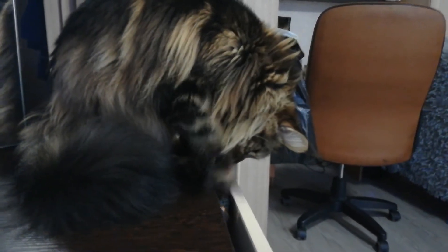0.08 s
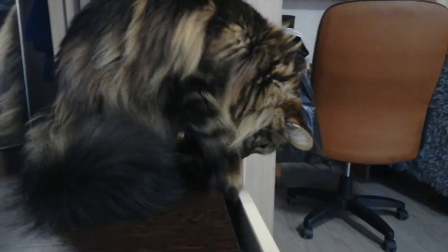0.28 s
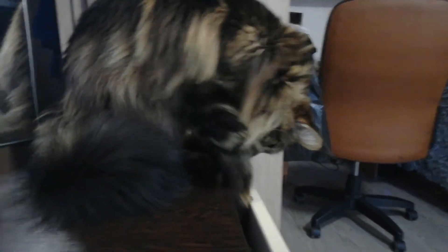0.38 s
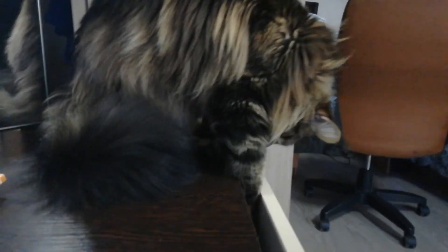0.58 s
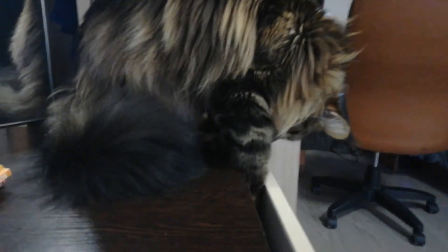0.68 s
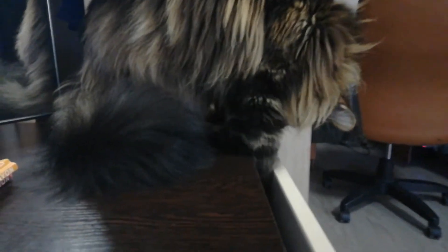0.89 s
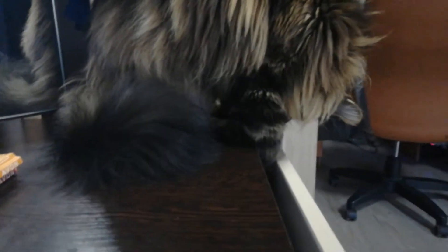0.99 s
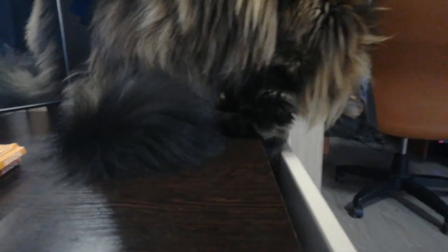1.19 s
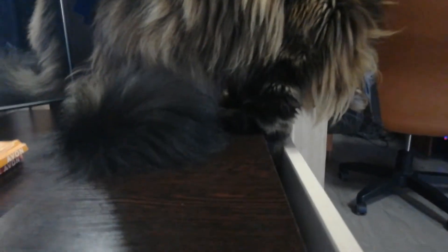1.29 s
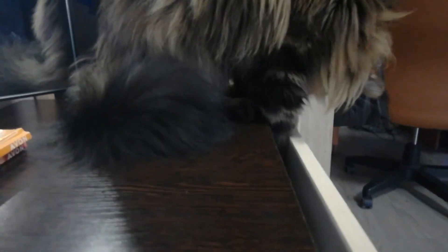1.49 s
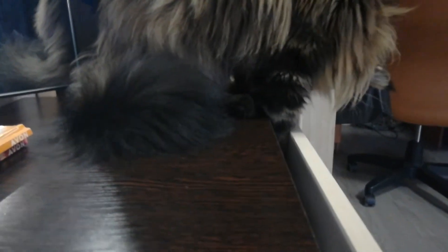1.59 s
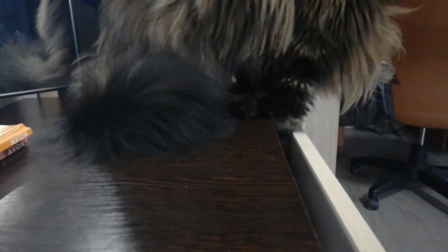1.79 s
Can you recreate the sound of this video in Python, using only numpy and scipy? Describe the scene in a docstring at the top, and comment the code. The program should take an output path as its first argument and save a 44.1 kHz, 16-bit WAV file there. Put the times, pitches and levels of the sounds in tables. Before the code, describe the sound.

Light clacks and ticks of small things pawed in a gap at a wooden desk's edge.

```python
"""Small hard objects knock on a wooden desk as a cat's paw fishes in a narrow gap at its edge.
Each knock is a click with a brief chatter: it makes the object clack, crack and tick,
the desk boom and the gap ring hollow. Between knocks the object drags lightly, the paw
pushes on the desk and fur brushes the boards. The small room echoes the knocks and rumbles quietly."""
import sys
import numpy as np
from scipy import signal
from scipy.fft import rfft, irfft
from scipy.io import wavfile
from scipy.ndimage import uniform_filter1d

SR = 44100
rng = np.random.default_rng(int(sys.argv[2]) if len(sys.argv) > 2 else 0)


def wav_record(signal):
    """Record a signal, one row per channel, as 16-bit PCM in the file named by sys.argv[1]."""
    frames = np.transpose(np.atleast_2d(signal))
    bounded = np.clip(frames, -1, 1)
    # unit amplitude maps onto the largest positive 16-bit level
    quanta = np.round(bounded * 32767).astype(np.int16)
    wavfile.write(sys.argv[1], SR, quanta)


N = 81585

# Each knock: t/s, level/dB of five parts (desk, hollow, clack, crack, tick),
# clack f/Hz, spread of the clack's tones (0 = all on one pitch), chatter length/s
KNOCKS = [ (0.1268, -37, -53, -40, -47, -40, 1400, 0.95, .0012),
          (0.2137, -20.5, -34, -19, -25, -12, 1480, 1.33, 0.0018),
          (0.3534, -42, -43, -38, -45, -44.5, 1910, 0.62, 0.0021),
          (0.4618, -50.5, -48, -42.5, -79, -71, 1650, 0.26, 0.0011),
          (0.4704, -44.5, -50.5, -41, -47, -47, 1400, 0.8, .0011),
          (0.5068, -48.5, -84, -52, -78, -75, 1520, 0.35, 0.0015),
          (.5497, -51, -69, -52.5, -81, -76, 1484, 0.4, 0.00057),
          (0.713, -55, -36.5, -44.5, -65, -61.5, 1480, 0.65, .001),
          (0.7253, -42.5, -59, -34.5, -70, -53, 1600, 0.77, .0014),
          (0.7319, -42.5, -38.5, -36.5, -42, -42.5, 1380, 0.48, 0.0018),
          (0.78, -48.5, -57, -50.5, -50.5, -55, 1470, 0.9, 0.00096),
          (.8855, -54, -49.5, -35, -47.5, -46.5, 1750, 0.56, .001),
          (.9175, -55, -49, -48, -78, -59, 1580, 1.06, .001),
          (0.9234, -40.5, -40, -36.5, -47, -37.5, 1850, 1, .0012),
          (1.0011, -30.5, -36.5, -19, -25.5, -17.5, 1606, 0.15, 0.0017),
          (1.0200, -38.5, -49, -42, -50, -33, 1600, .8, .0015),
          (1.0451, -67, -61, -32, -59, -57, 1593, 0.24, 0.00038),
          (1.0557, -30.5, -30, -20, -26.5, -19.5, 1620, 0.91, .0011),
          (1.1698, -38.5, -44.5, -41.5, -60, -59, 1537, 1.07, 0.0013),
          (1.2090, -51, -54.5, -46, -65, -69, 1980, 0.65, 0.00075),
          (1.4205, -58.5, -52, -50.5, -61, -53.5, 1500, 0.84, 0.00061),
          (1.4367, -59.5, -54, -53, -71, -55, 1560, 0.9, 0.00058),
          (1.4415, -56.5, -50.5, -41.5, -48.5, -45.5, 1530, 0.98, .0012),
          (1.5683, -69, -64.5, -41, -60.5, -52.5, 1674, 0.6, .0009),
          (1.5867, -50.5, -36, -26, -40.5, -35.5, 1780, 0.85, .0019), ]
def knocks():
    """Every knock shakes both the wood and the object that hits it."""
    desk, objects = np.zeros((2, 2, N))
    for start, desk_db, hollow_db, clack_db, crack_db, tick_db, pitch_hz, spread, chatter_s in KNOCKS:
        add(objects, start, object_clack(clack_db, chatter_s, pitch_hz, spread))
        add(objects, start, object_crack(crack_db, chatter_s))
        add(objects, start, object_tick(tick_db, chatter_s))
        add(desk, start, desk_boom(desk_db, chatter_s))
        add(desk, start, gap_hollow(hollow_db, chatter_s))
    return desk, objects


# The object's middle tones: multiple of the pitch at spread 1, level/dB, fade/s (time to drop 60 dB)
CLACK_TONES = [(.83, -1.5, 0.0056), (0.998, -1, 0.011), (1.16, -4.5, 0.011), (1.36, -5, 0.0087)]
def object_clack(db, chatter_s, pitch_hz, spread):
    """The object rings around a pitch that changes from knock to knock."""
    tones = [(pitch_hz * multiple ** spread, level, fade) for multiple, level, fade in CLACK_TONES]
    return struck(tones, db - 2.5, chatter_s, chatter_db=-2, left_db=4, width=0)


# The object's high tones: f/Hz, level/dB, fade/s
CRACK_TONES = [(2640, -4.5, 0.0044), (3520, -4.5, 0.0056), (4350, -3, 0.0037), (5712, -3, 0.0035)]
def object_crack(db, chatter_s):
    """These tones die so fast that they sound like one sharp crack."""
    return struck(CRACK_TONES, db - 3.5, chatter_s, chatter_db=7, left_db=-1, width=.5)


# The object's highest tones: f/Hz, level/dB, fade/s
TICK_TONES = [(6420, -3.5, 0.0058), (6610, -8, 0.019), (7042, -4.5, 0.015), (7280, -9, .028),
              (7850, -0.5, .007), (8680, -4, 0.0076), (9440, -3, 0.0026), (12060, -5, 0.0017),
              (13700, -13.5, 0.0044)]
def object_tick(db, chatter_s):
    """Harder knocks are brighter: their tones above 8500 Hz ring more strongly."""
    db_per_octave = .48 * (db + 17.5)
    tones = [(hz, level + db_per_octave * max(np.log2(hz / 8500), 0), fade)
             for hz, level, fade in TICK_TONES]
    return struck(tones, db - 3.5, chatter_s, chatter_db=10.5, left_db=-3.5, width=1)


# The desk's low tones: f/Hz, level/dB, fade/s
DESK_TONES = [(125.7, -12.5, 0.16), (146.83, -17, .8), (173, -12, 0.027), (202.75, -2, 0.17),
              (240, -2, 0.1), (309.7, -4, 0.11), (348, -2.5, 0.036), (417.6, -1, 0.032)]
def desk_boom(db, chatter_s):
    """The boards ring lower and longer than the object."""
    return struck(DESK_TONES, db - 1, chatter_s, chatter_db=-22.5, left_db=0, width=1)


# The gap's tones: f/Hz, level/dB, fade/s
GAP_TONES = [(530, -8.5, .014), (652, -5, 0.017), (803, -2.5, 0.027), (882.4, -1.5, 0.029),
             (1028, -8, 0.022)]
def gap_hollow(db, chatter_s):
    """The narrow gap answers with a short, hollow ring."""
    return struck(GAP_TONES, db - .5, chatter_s, chatter_db=4, left_db=4, width=1)


def struck(tones, db, chatter_s, chatter_db, left_db, width):
    """One hit sets fading tones ringing; left_db tips the sound toward the left ear."""
    window_s = .008  # db is the level if all the energy fell within this time
    length_s = min(.5, max(fade for _, _, fade in tones) + window_s)
    t = np.arange(int(length_s * SR)) / SR
    t = np.maximum([t, t - .00005], 0)  # the right ear hears it a little later
    ring = sum((-1) ** k * from_db(level - 60 * t / fade) * np.sin(2 * np.pi * hz * t)
               for k, (hz, level, fade) in enumerate(tones))
    force = contact_force(chatter_s, chatter_db, width)
    balance = from_db([[left_db / 2], [-left_db / 2]])
    sound = unit(signal.fftconvolve(force, ring, axes=1) * balance)
    return from_db(db) * np.sqrt(window_s * SR) * sound


def contact_force(chatter_s, chatter_db, width):
    """A click in a burst of chatter; width 0 gives both ears the same chatter, 1 gives each its own."""
    age = np.arange(SR // 50) / SR / chatter_s
    shape = np.sqrt(age) * np.exp(-age)
    noise = rng.standard_normal((3, len(age)))
    chatter = np.sqrt(1 - width) * noise[0] + np.sqrt(width) * noise[1:]
    force = from_db(chatter_db) * unit(chatter * shape)
    force[:, np.searchsorted(age[:-1], .5)] += 1  # the click, at the chatter's peak
    for _ in range(3):  # make all pitches about equally strong, yet keep the burst short
        spectrum = rfft(force)
        force = irfft(spectrum / (np.abs(spectrum) + 1e-9), len(age)) * shape ** .25
    return force


# Each drag: middle t/s, half-length/s, level/dB
DRAGS = [(.53, 0.059, -68.5), (1.24, 0.053, -56.5), (1.36, 0.062, -60)]
# Its tone colour: f/Hz, level/dB
DRAG_COLOUR = [(500, -10.5), (900, -11.5), (1600, 3), (2400, -9), (7000, -20), (15000, -63)]
def object_drags():
    """The object scrapes lightly along the board."""
    return rubbing(DRAGS, DRAG_COLOUR, grain_db=2.5)


# Each push of the paw: t/s, level/dB
PUSHES = [(.128, -54), (.222, -44.5), (0.301, -50), (1.006, -50), (1.061, -49), (1.644, -53)]
def paw_pushes():
    """A soft push sways the desk top at its lowest tone."""
    pitch_hz, rise_s, fade_s = 64, .012, .11
    out, t = np.zeros((2, N)), np.arange(N) / SR
    swell = (1 - np.exp(-t / rise_s)) * from_db(-60 * t / fade_s)
    sway = np.sin(2 * np.pi * pitch_hz * t) * swell
    for start, db in PUSHES:
        add(out, start, from_db(db) * sway / sway.max())
    return out


# Each brush of fur: middle t/s, half-length/s, level/dB
BRUSHES = [(.45, .03, -83), (.80, 0.033, -62.5), (0.958, 0.078, -58), (1.29, .04, -64.5),
           (1.84, 0.021, -63)]
# Its tone colour: f/Hz, level/dB
FUR_COLOUR = [(500, 1), (1600, 5.5), (3000, -3), (5000, -1), (7200, 5), (9500, -27), (15000, -20.5)]
def fur_brushes():
    """Fur slides over the boards with a soft hiss."""
    return rubbing(BRUSHES, FUR_COLOUR, grain_db=3)


def rubbing(strokes, colour, grain_db):
    """Rubbing makes a grainy hiss that swells and fades with each stroke."""
    t = np.arange(N) / SR
    swell = sum(from_db(db) * np.exp(-((t - middle) / half) ** 2) for middle, half, db in strokes)
    grain = unit(uniform_filter1d(rng.standard_normal(N), size=90)) * np.sqrt(N)
    return swell * from_db(grain_db * grain) * coloured_noise(colour)


# The echo's tone colour: f/Hz, level/dB
ECHO_COLOUR = [(100, -11), (220, -7.5), (450, -6), (850, -9), (1600, -12.5), (3500, -4), (7000, -13.5),
               (14000, -16)]
# How long its tail lasts: f/Hz, fade/s
ECHO_FADE = [(100, 1), (250, 0.19), (700, 0.37), (1800, 0.39), (4000, 0.4), (7500, 0.4), (14000, 0.13)]
def room_echo(sound):
    """Sound bounces quickly off the furniture, then each pitch dies away at its own speed."""
    build_s, early_fade_s = .0017, .22
    t = np.arange(int(.8 * SR)) / SR
    build = 1 - np.exp(-(t / build_s) ** 2)
    early = from_db(3) * unit(build * from_db(-60 * t / early_fade_s))
    echo = 0
    for hz, band in noise_bands(len(t)):
        tail = unit(build * from_db(-60 * t / at_hz(ECHO_FADE, hz)))
        echo += from_db(at_hz(ECHO_COLOUR, hz)) * band * np.hypot(early, tail)
    return signal.fftconvolve(sound, echo, axes=1)[:, :N]


# The quiet room's tone colour: f/Hz, level/dB
RUMBLE_COLOUR = [(25, -14), (65, 1), (160, -2), (260, -13), (450, -18.5), (900, -18), (1700, -20.5),
                 (3000, -26.5), (8000, -29.5), (16000, -39.5)]
def room_rumble():
    """The room has a steady rumble and a faint hiss."""
    return from_db(-59.5) * coloured_noise(RUMBLE_COLOUR)


def coloured_noise(colour):
    """Steady noise whose lows and highs follow a table."""
    return unit(sum(from_db(at_hz(colour, hz)) * band for hz, band in noise_bands(N))) * np.sqrt(N)


# How alike noise is in the two ears: f/Hz, likeness (1 = the same)
LIKENESS = [(60, 0.98), (150, 1), (300, 0.5), (700, 0.083), (2000, 0.19), (12000, .05)]
def noise_bands(size):
    """Noise in half-octave slices: the ears share the low ones and hear the high ones differently."""
    edges = 22 * 2 ** np.arange(0, 9.6, .5)
    white = rng.standard_normal((2, 2, size + SR // 4))
    for k, (low, high) in enumerate(zip(edges, edges[1:])):
        bandpass = signal.butter(2, [low, high], "band", fs=SR, output="sos")
        mid, side = signal.sosfilt(bandpass, white[k % 2])[:, -size:]
        hz = np.sqrt(low * high)
        alike = np.clip(at_hz(LIKENESS, hz), 0, .995)
        yield hz, np.sqrt((1 + alike) / 2) * mid + np.sqrt((1 - alike) / 2) * side * [[1], [-1]]


def from_db(db):
    """Turn decibels into a multiplier."""
    return 10 ** (np.asarray(db) / 20)


def unit(x):
    """Scale to an average energy of one per channel."""
    return x / np.sqrt(np.mean(np.sum(x ** 2, axis=-1)) + 1e-20)


def at_hz(points, hz):
    """Read between a table's rows at a given pitch."""
    freqs, values = np.transpose(points)
    return np.interp(np.log(hz), np.log(freqs), values)


def add(out, start_s, sound):
    """Mix a sound in at a given time."""
    i = max(int(start_s * SR), 0)
    out[:, i:i + sound.shape[-1]] += sound[..., :N - i]


def scene():
    """Mix the knocks and their echoes with the drags, the paw and the quiet room."""
    desk, objects = knocks()
    out = desk + objects + room_echo(desk + objects)
    add(out, .0042, from_db(-9) * objects)  # a bounce off the facing board
    return out + object_drags() + paw_pushes() + fur_brushes() + room_rumble()


def record(dry):
    """Flatten any peak that is too loud, then cut the very highest pitches."""
    lowpass = signal.cheby2(14, 60, 16500, fs=SR, output="sos")
    return signal.sosfilt(lowpass, np.clip(dry, -.85, .85))


dry = scene()
out = record(dry)
wav_record(out)
```